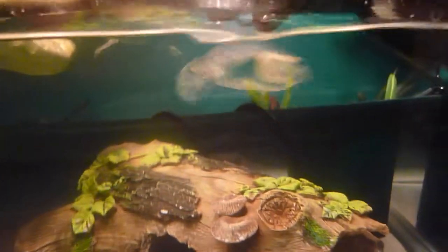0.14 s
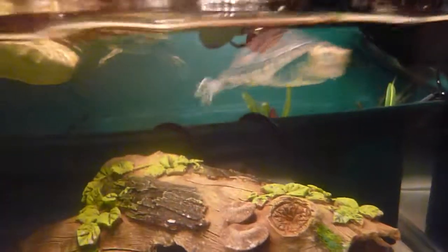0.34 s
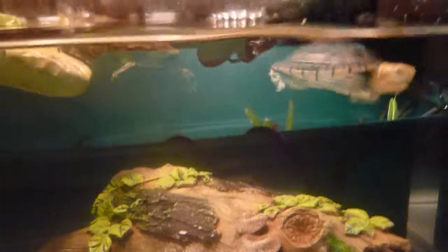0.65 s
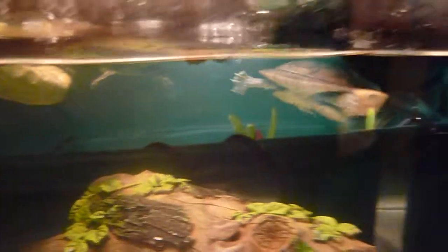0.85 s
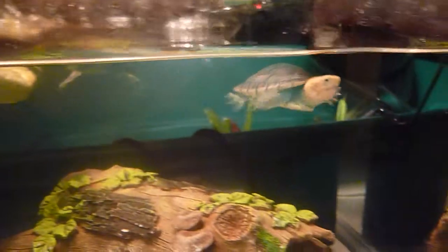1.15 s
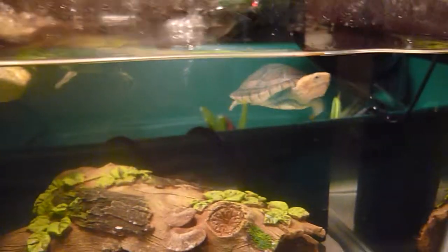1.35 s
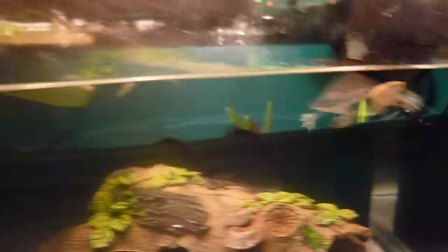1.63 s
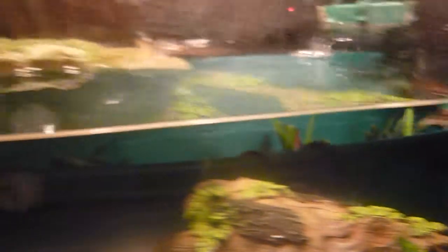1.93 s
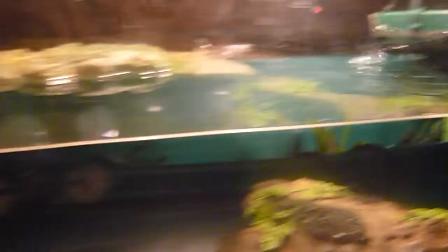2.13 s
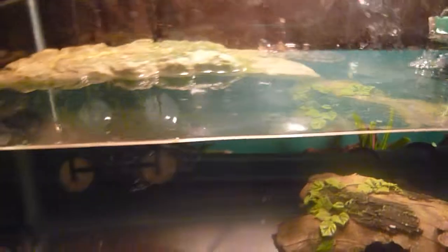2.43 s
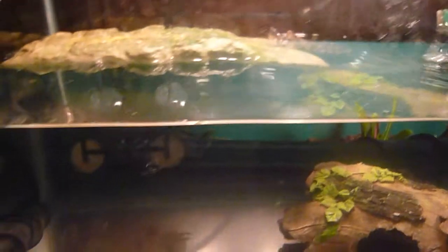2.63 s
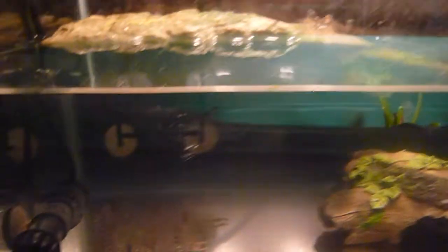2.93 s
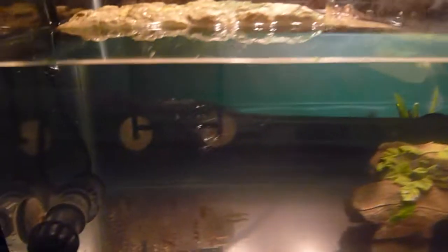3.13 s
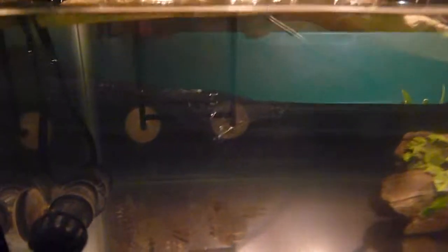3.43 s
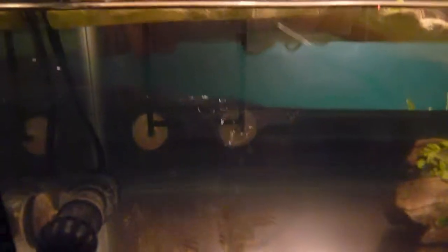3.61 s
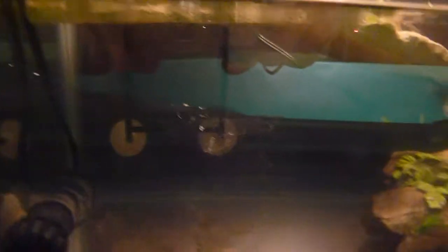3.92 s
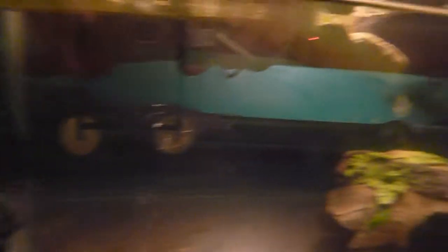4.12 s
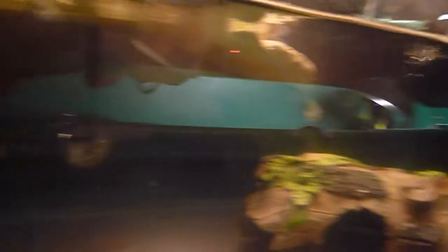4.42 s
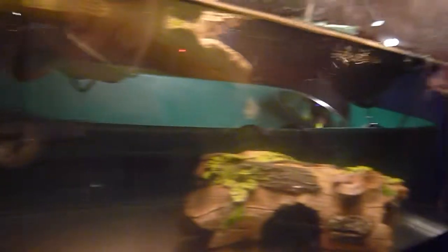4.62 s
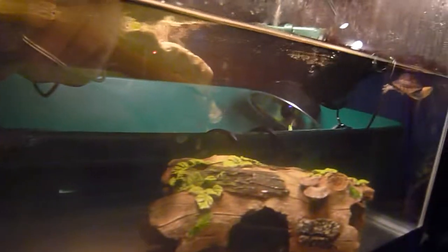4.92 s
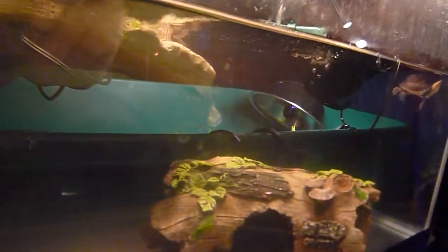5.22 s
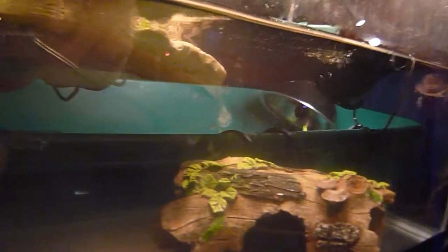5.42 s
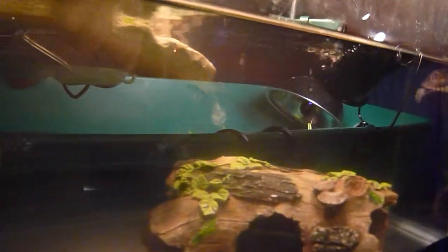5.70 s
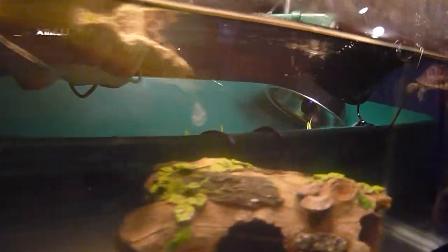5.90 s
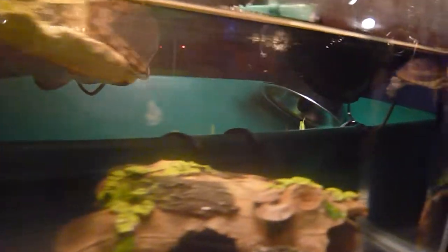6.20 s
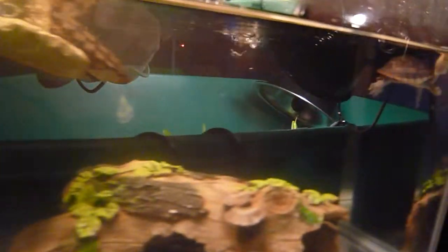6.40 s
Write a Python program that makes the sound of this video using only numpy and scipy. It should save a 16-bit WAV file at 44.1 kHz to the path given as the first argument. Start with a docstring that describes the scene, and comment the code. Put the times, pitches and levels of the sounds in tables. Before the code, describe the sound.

Quiet close recording beside an aquarium indoors: deep mains hum and muffled water churn continue throughout beneath an even hiss. Irregular drips plink, droplets patter and little films burst in soft fizz, with short glassy reflections. A thin motor whine with fluttering gears comes and goes before three seconds, catching twice, and two small clicks sound past four seconds. The water then carries on unchanged to the end.

```python
"""An aquarium filter hums in a turtle tank indoors: mains harmonics and rotor lines over rumbling, churning water.
Its outflow trickles onto the surface: drips trap bubbles that ring briefly, droplets patter, films burst in
fine spray, and the glass and the room echo them. A steady hiss with faint glass rings lies beneath.
A camera's lens motor whirrs and whines once, its body ticks twice; the microphone has a deep notch near 2 kHz."""
import sys
import numpy as np
from scipy import signal
from scipy.fft import rfft, irfft
from scipy.io import wavfile

SR = 44100
rng = np.random.default_rng(int(sys.argv[2]) if len(sys.argv) > 2 else 0)


def bounce(signal):
    """Save signal as a 16-bit WAV file at the path given by the first command-line argument."""
    frames = np.transpose(np.atleast_2d(signal))
    limited = np.clip(frames, -1, 1)
    pcm = np.round(limited * 32767).astype(np.int16)
    wavfile.write(sys.argv[1], SR, pcm)


N = 288855
TIME = np.arange(N) / SR
FREQS = np.maximum(np.arange(N // 2 + 1) * SR / N, 1)


def from_db(db):
    """Decibels to gain."""
    return 10 ** (np.asarray(db) / 20)


def rms_one(x):
    """Scale to an rms of 1."""
    return x / np.sqrt(np.mean(x ** 2) + 1e-20)


def in_time(rows):
    """Interpolate the columns of a (t/s, ...) curve at every sample."""
    s, *columns = np.transpose(rows)
    return [np.interp(TIME, s, column) for column in columns]


def add(track, s, sound):
    """Mix a short sound in at time s."""
    at = max(int(s * SR), 0)
    track[at:at + len(sound)] += sound[:max(N - at, 0)]


def band(x, low_hz, high_hz):
    """Causal band-pass, at least 100 Hz wide before the edges are clipped."""
    edges_hz = np.clip([low_hz, max(high_hz, low_hz + 100)], 10, .45 * SR)
    return signal.sosfilt(signal.butter(2, edges_hz, "band", fs=SR, output="sos"), x)


def drift(rate_hz):
    """Slow random signal, low-passed near rate_hz; rms 1."""
    spectrum = rfft(rng.standard_normal(N))
    return rms_one(irfft(spectrum / (1 + (FREQS / rate_hz) ** 2), N))


def noise(spectrum, resonances=()):
    """Noise with a smooth colour and resonant peaks on top; rms 1."""
    hz, db = np.transpose(spectrum)
    colour = from_db(np.interp(np.log(FREQS), np.log(hz), db))
    colour = colour * np.minimum(FREQS / hz[0], 1) ** 2  # roll-off below the first point
    peak_power = sum(from_db(gain_db) ** 2 / (1 + (2 * (FREQS - centre_hz) / width_hz) ** 2)
                     for centre_hz, width_hz, gain_db in resonances)
    white = rfft(rng.standard_normal(N))
    return rms_one(irfft(white * colour * np.sqrt(1 + peak_power), N))


def resonance(hz, width_hz):
    """Turbulence ringing in one mode; rms 1."""
    detune = hz / width_hz * (FREQS / hz - hz / FREQS)
    return rms_one(irfft(rfft(rng.standard_normal(N)) / (1 + 1j * detune), N))


def pump(churn_db, churn_left_db, surge_db):
    """The motor shakes at twice the mains frequency; the water it drives rumbles in the housing."""
    mains_hz = 60
    # hum standing in waves along the tank: (multiple of mains, level at right end/dB, change at left end/dB)
    hum_lines = [(2, -35, -1.77), (3, -58, 4.5), (4, -59, 6), (5, -62, 3.5), (6, -58, -6.5), (8, -64.5, 0),
                 (10, -73, 7.5)]
    # turning parts, out of step with the mains: (f/Hz, level at right end/dB, change at left end/dB)
    rotor_lines = [(56.8, -57.5, 3.5), (219.5, -80, -7), (259.1, -63.5, 3)]
    # housing and tank modes: (f/Hz, width/Hz, level at right end/dB, change at left end/dB)
    housing_modes = [(87.4, 6.2, -50.5, -2), (260, 15, -56.5, 5.5), (461, 32.4, -48, -6.5),
                     (544, 8.9, -69.5, 3.5), (666, 40, -62.5, 1), (1084, 18, -74, 7)]
    # colour of the churning water: (f/Hz, relative density/dB per Hz)
    churn_colour = [(28, -31), (36, 5), (48, -9.5), (66, 4), (95, 6.5), (130, 1), (185, -2.5), (260, 0),
                    (340, 1.5), (520, -6.5), (760, -14.5), (1300, -16), (2000, -22.5), (4000, -34)]
    # microphone along the tank: (t/s, position 0 = right end .. 1 = left end)
    mic_place = [(0, .05), (1.25, 0), (2.0, .5), (2.8, 1), (4.1, 1), (4.9, .85), (5.7, .7), (6.55, .35)]

    place, = in_time(mic_place)
    lines = [(round(k) * mains_hz, db, left_db) for k, db, left_db in hum_lines] + list(rotor_lines)
    hum = np.zeros(N)
    for hz, db, left_db in lines:
        sine = np.sin(2 * np.pi * (hz * TIME + rng.random()))
        hum += from_db(db + left_db * place) * np.sqrt(2) * sine  # levels are rms
    housing = sum(from_db(db + left_db * place) * resonance(hz, width_hz)
                  for hz, width_hz, db, left_db in housing_modes)
    churn = from_db(churn_db + churn_left_db * place) * noise(churn_colour)
    surge = from_db(surge_db * drift(25))
    return hum + (churn + housing) * surge


def hiss(level_db):
    """Steady coloured noise with faint rings of the glass."""
    # (f/Hz, relative density/dB per Hz)
    hiss_colour = [(300, -12), (1500, 2.5), (2800, 5), (4500, 3.5), (7000, -0.5), (11000, -3.5),
                   (16000, -5.5)]
    # glass rings: (f/Hz, width/Hz, level above the hiss/dB)
    glass_modes = [(2746, 27, 3), (3270, 63, 3), (3690, 20, 2)]
    return from_db(level_db) * noise(hiss_colour, glass_modes)


def bubble(hz, t60_s, rise, wobble):
    """A trapped bubble rings; its pitch climbs as it nears the surface, with random jitter."""
    t = np.arange(int(1.5 * t60_s * SR)) / SR
    swell = 1 - np.exp(-t * hz / 2)
    pitch_hz = hz * (1 + rise * t / t60_s + wobble * rng.standard_normal(len(t)))
    return swell * from_db(-60 * t / t60_s) * np.sin(2 * np.pi * np.cumsum(pitch_hz) / SR)


def trickle(per_s, level_db, spread_db, low_hz, high_hz, cycles):
    """Many faint bubbles of random size where the outflow meets the surface; t60 is a count of cycles."""
    out = np.zeros(N)
    for when, size, strength in rng.random((int(per_s * N / SR), 3)):
        hz = low_hz * (high_hz / low_hz) ** size
        gain = from_db(level_db - spread_db * np.sqrt(strength))
        add(out, when * N / SR, gain * bubble(hz, cycles / hz, rise=0.096, wobble=0.12))
    return out


def patter(per_s, level_db, spread_db):
    """Tiny droplets tick on the surface without trapping air: short decaying bands of noise."""
    out, t = np.zeros(N), TIME[:SR // 40]
    for when, size, strength in rng.random((int(per_s * N / SR), 3)):
        low_hz = 2500 * 4 ** size
        click = rng.standard_normal(len(t)) * from_db(-60 * t / 0.025)
        tick = band(click, low_hz, 1.53 * low_hz)
        add(out, when * N / SR, from_db(level_db - spread_db * strength) * tick / np.abs(tick).max())
    return out


def burst(hz, octaves):
    """A bursting film throws fine droplets: a band of hiss swells and dies, slower if wider than an octave."""
    rise_s, t60_s = 0.0018, 0.018  # up to one octave; wider bursts hold more droplets and last longer
    t = TIME[:SR // 6]
    edges_hz = hz * 2 ** (np.array([-.5, .5]) * octaves)
    fizz = band(band(rng.standard_normal(len(t)), *edges_hz), *edges_hz)
    age_s = t / max(octaves, 1)
    swell = np.minimum(age_s / rise_s, 1)
    decay = from_db(-60 * np.maximum(age_s - rise_s, 0) / t60_s)
    return rms_one(fizz) * swell * decay


def froth(per_s, level_db, low_hz, high_hz, octaves):
    """Faint bursts keep coming, at loose intervals, as the froth under the outflow breaks."""
    out = np.zeros(N)
    for k, (when, size) in enumerate(rng.random((int(per_s * N / SR), 2))):
        hz = low_hz * (high_hz / low_hz) ** size
        add(out, (k + when) / per_s, from_db(level_db) * burst(hz, octaves))
    return out


def ring_time(hz):
    """The t60 of a bubble follows its size: small, high ones die sooner."""
    t60_s, at_hz, fall_power = .019, 3020, 0.5
    return t60_s * (at_hz / hz) ** fall_power


def drips(gain_db, rise, wobble):
    """The clear plinks, one trapped bubble each."""
    # (t/s, f/Hz, peak level before gain_db/dB)
    plinks = [(.073, 1268, -31.5), (.075, 2910, -33.5), (.078, 8500, -45), (.088, 1420, -38.5),
              (.088, 2870, -39), (.38, 5170, -41.5), (0.519, 1085, -35), (.566, 4260, -46.5),
              (.567, 7400, -45), (.63, 7800, -43), (.926, 7700, -42), (1.117, 3530, -34.5),
              (1.123, 3870, -36.5), (1.18, 2720, -44), (1.269, 8200, -47), (1.44, 4500, -41.5),
              (1.737, 4470, -44), (2.4, 2710, -33.5), (2.469, 5260, -41), (2.666, 4520, -47),
              (2.701, 3340, -39.5), (2.785, 1280, -38.5), (2.885, 6000, -40), (2.914, 5630, -36.5),
              (2.926, 1060, -35), (2.926, 3330, -40), (3.432, 2730, -35.5), (3.677, 5570, -43),
              (4.136, 3050, -44.5), (4.151, 458, -32), (4.522, 1070, -39.5), (4.523, 2900, -36.5),
              (5.133, 6400, -42), (5.243, 2330, -40.5), (5.885, 2780, -40.5), (6.178, 2750, -36)]
    out = np.zeros(N)
    for s, hz, db in plinks:
        add(out, s, from_db(db + gain_db) * bubble(hz, ring_time(hz), rise, wobble))
    return out


def spray(gain_db):
    """The clear bursts of fine droplets."""
    # (t/s, level before gain_db/dB, centre f/Hz, width/octaves)
    bursts = [(.234, -52.5, 9700, .8), (.345, -51.5, 3630, 1.2), (.444, -50.5, 11500, 2.6),
              (.803, -52.5, 6750, 4.4), (0.93, -51, 10000, 1), (1.76, -55, 8800, 2.2),
              (3.225, -49.5, 9500, .5), (3.311, -52, 4000, 0.6), (3.825, -48.5, 9000, 3.2),
              (4.674, -45, 13400, 0.42), (4.807, -51.5, 6300, 1.7), (4.824, -49, 4470, 0.35),
              (5.226, -52, 8300, 1), (5.858, -52, 5700, .6), (5.922, -53, 14400, .25),
              (6.17, -54.5, 8900, 1.2)]
    out = np.zeros(N)
    for s, db, hz, octaves in bursts:
        add(out, s, from_db(db + gain_db) * burst(hz, octaves))
    return out


def room(glass_db, glass_t60_s, room_db):
    """The echoes of one click: quick sparse reflections between the glass walls and the short room tail."""
    room_t60_s = 0.19
    t = TIME[:SR // 2]
    sparse = rng.standard_normal(len(t)) * (rng.random(len(t)) < 1500 / SR)  # about 1500 per s
    glass = sparse * from_db(-60 * t / glass_t60_s) * (t > .002)
    tail = rng.standard_normal(len(t)) * from_db(-60 * t / room_t60_s) * (t > .008)
    glass_echo = from_db(glass_db) * glass / np.linalg.norm(glass)
    return glass_echo + from_db(room_db) * tail / np.linalg.norm(tail)


def lens(level_db, flutter_db, whine_waver):
    """The lens motor swells, runs and fades: a thin whine over fluttering gears that catch twice."""
    start_s, stop_s, ramp_s, catch_t60_s = 2.186, 2.82, 0.1, 0.096
    # (t/s, turning rate/Hz)
    turning = [(2.22, 2800), (2.3, 2985), (2.38, 3140), (2.52, 3150), (2.58, 3050), (2.68, 3020),
               (2.78, 2920)]
    # colour of the gear whirr: (f/Hz, relative density/dB per Hz)
    whirr_colour = [(500, 0.5), (1200, 5), (2600, -6.5), (5000, -5), (6000, -17), (12000, -21),
                    (16000, -24)]
    # (multiple of turning rate, peak level re whirr rms/dB)
    whine_lines = [(3, -19), (4, -23), (5, -15)]
    # gear catches: (t/s, gain re whirr/dB)
    gear_catches = [(2.339, 4), (2.641, 10.5)]

    turning_hz, = in_time(turning)
    turns = np.cumsum(turning_hz * (1 + whine_waver * drift(60))) / SR
    whine = sum(from_db(db) * np.sin(2 * np.pi * round(k) * turns) for k, db in whine_lines)
    running = np.clip(np.minimum(TIME - start_s, stop_s - TIME) / ramp_s, 0, 1)
    catches = sum((TIME > s) * from_db(db - 60 * np.abs(TIME - s) / catch_t60_s) for s, db in gear_catches)
    flutter = from_db(flutter_db * drift(40))
    whirr = noise(whirr_colour) * (flutter + catches)
    return from_db(level_db) * running * (whirr + whine)


def ticks(t60_s, low_hz, high_hz):
    """Dry ticks come through the camera body: decaying bands of noise."""
    # (t/s, peak level/dB)
    tick_times = [(4.35, -34), (4.424, -33.5)]
    out, t = np.zeros(N), TIME[:SR // 50]
    for s, db in tick_times:
        snap = band(rng.standard_normal(len(t)) * from_db(-60 * t / t60_s), low_hz, high_hz)
        add(out, s, from_db(db) * snap / np.abs(snap).max())
    return out


def scene():
    """Pump, echoing water and camera over a steady hiss."""
    filter_hum = pump(churn_db=-44.0, churn_left_db=-0.5, surge_db=.5)
    water = trickle(per_s=23, level_db=-49.0, spread_db=10, low_hz=2250, high_hz=8840, cycles=38)
    water += patter(per_s=9, level_db=-45.5, spread_db=10)
    water += froth(per_s=2.2, level_db=-56, low_hz=3500, high_hz=8100, octaves=.3)
    water += drips(gain_db=1.4, rise=0.03, wobble=0.21)
    water += spray(gain_db=1.5)
    echoes = room(glass_db=-4, glass_t60_s=0.038, room_db=-0.5)
    echoed = signal.fftconvolve(water, echoes)[:N]
    camera = lens(level_db=-54, flutter_db=0.5, whine_waver=0.0023)
    camera += ticks(t60_s=0.012, low_hz=4800, high_hz=13500)
    mix = filter_hum + hiss(level_db=-58.5) + water + echoed + camera
    return mix[None]


def record(dry):
    """The microphone path has one deep notch, and a steep low-pass cuts the top."""
    notch_hz, notch_q, cutoff_hz = 2105, 1.9, 15720
    notched = signal.lfilter(*signal.iirnotch(notch_hz, notch_q, fs=SR), dry)
    return signal.sosfilt(signal.ellip(16, .1, 90, cutoff_hz, fs=SR, output="sos"), notched)


dry = scene()
out = record(dry)
bounce(out)
```